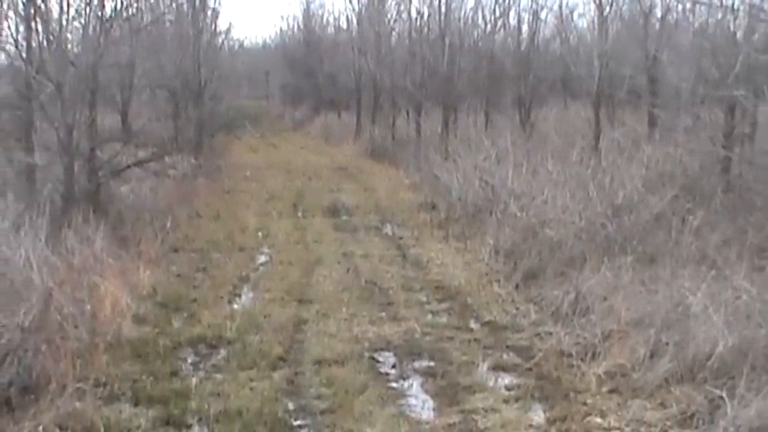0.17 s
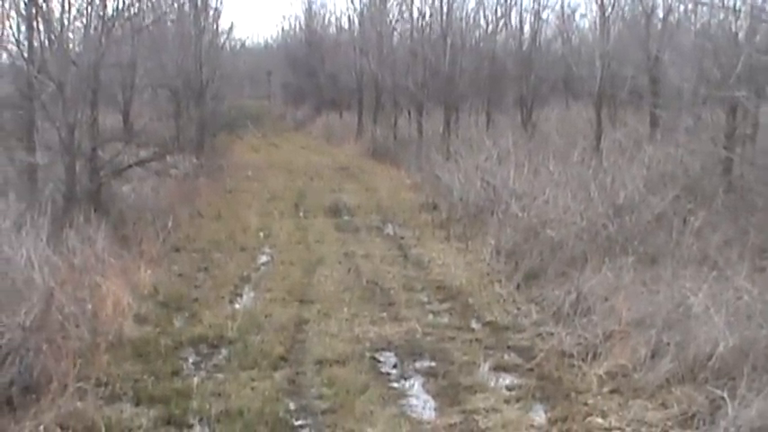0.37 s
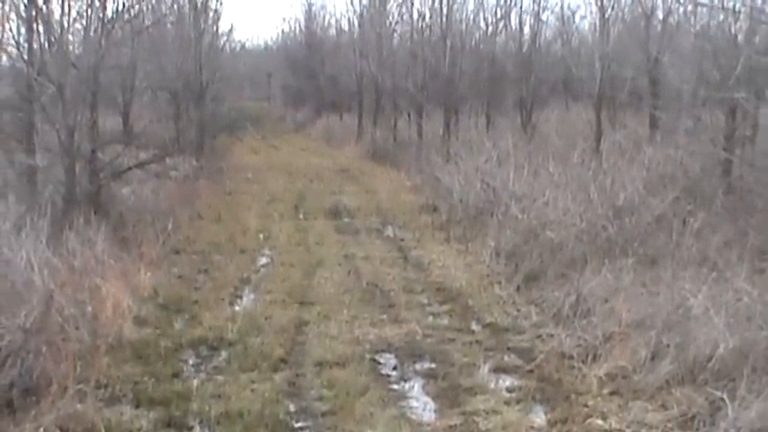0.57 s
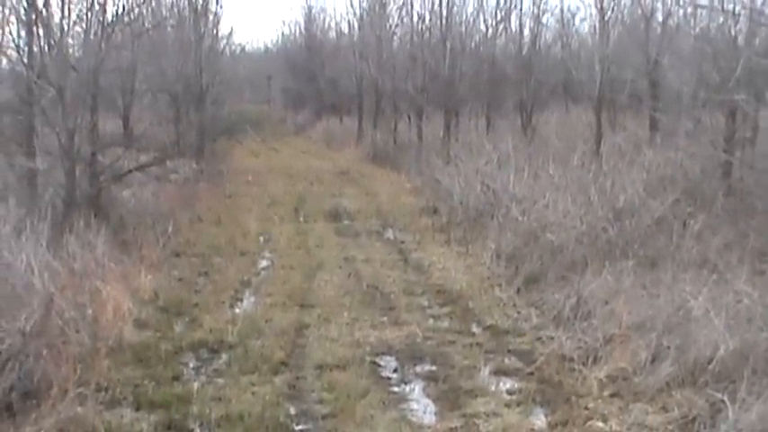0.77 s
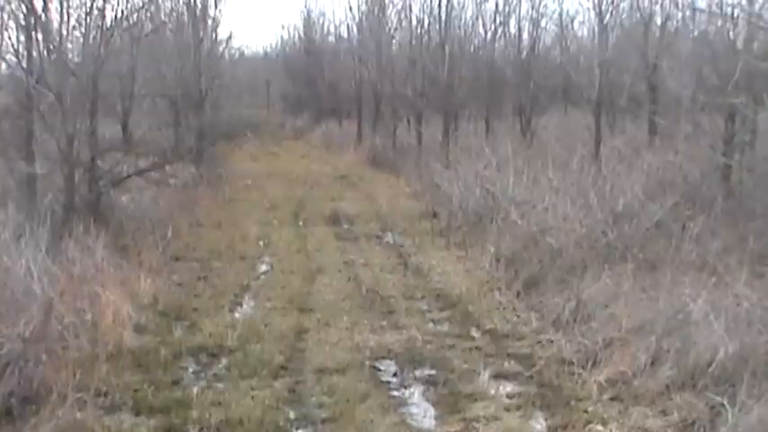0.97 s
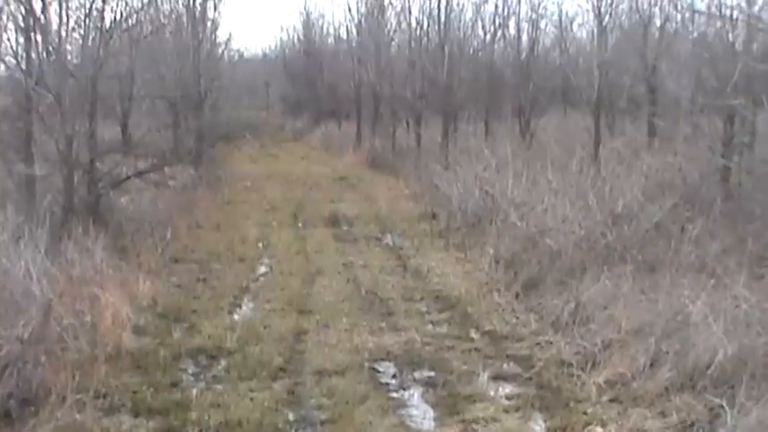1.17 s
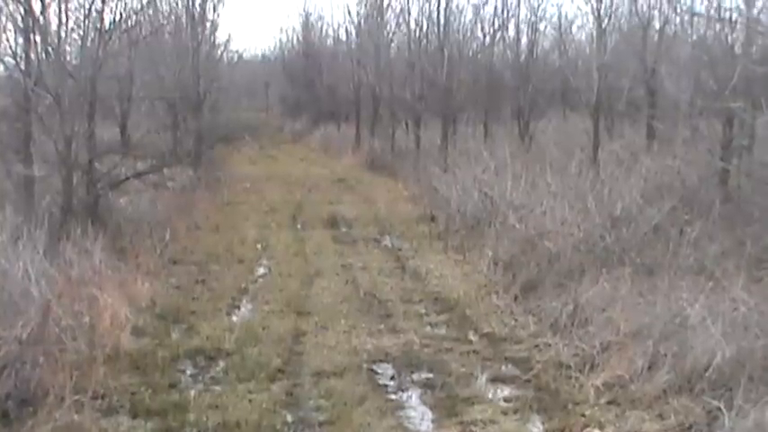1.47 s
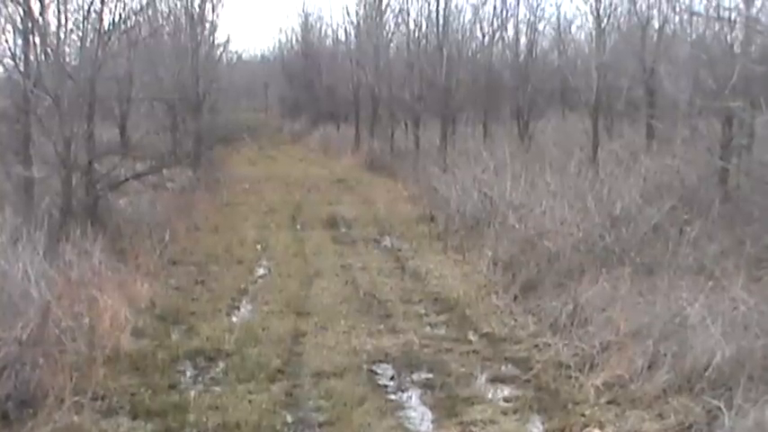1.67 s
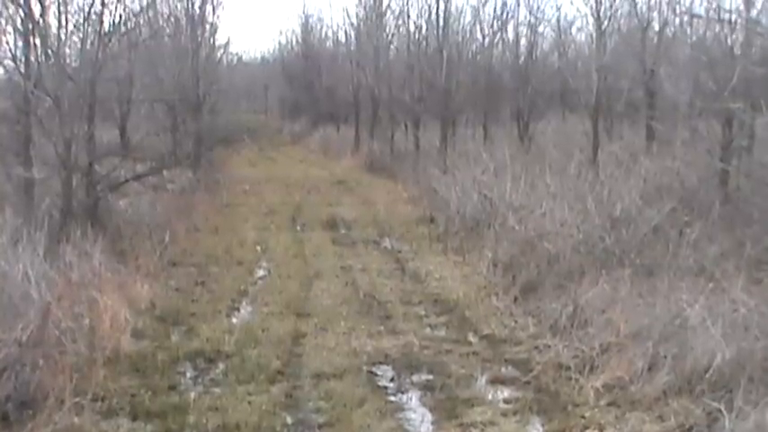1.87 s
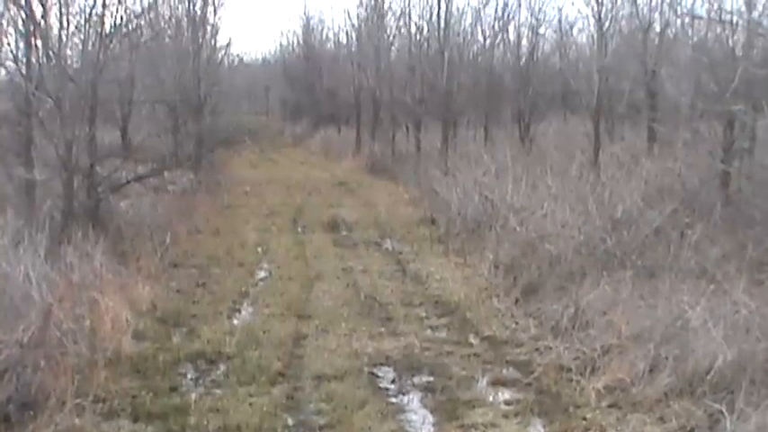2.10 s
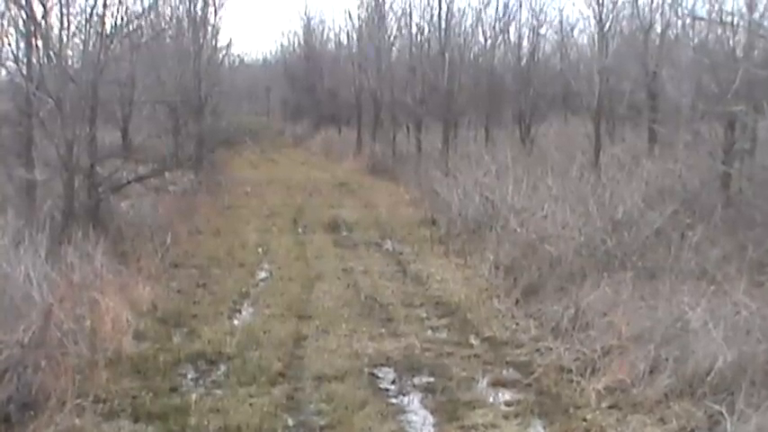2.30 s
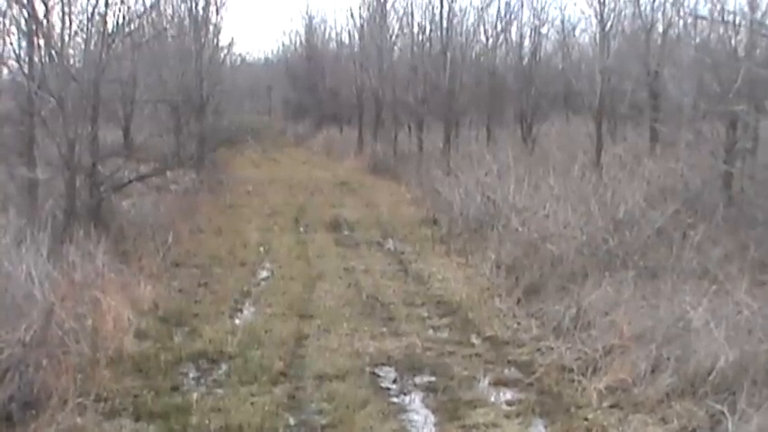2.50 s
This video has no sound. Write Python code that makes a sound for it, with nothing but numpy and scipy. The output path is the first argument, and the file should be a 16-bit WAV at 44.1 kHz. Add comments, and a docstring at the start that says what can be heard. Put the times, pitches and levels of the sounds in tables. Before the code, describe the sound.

A beagle gives five short, squeaky, hoarse yelps about half a second apart, each ending in a quick falling hoot. Trees scatter the echoes; a twig ticks early and wind rumbles on the microphone near the end.

```python
"""At first the trees still ring from an earlier bayed note, over a quiet steady hiss and a thin high whine.
A beagle then yelps five times, about half a second apart. Each yelp opens with a high squeak, breaks into
a lower rasp, settles on a clear bayed note and ends in a falling hoot; trees scatter echoes of it all.
The voice is built from overtones. A twig ticks (filtered noise that dies fast) after the first yelp;
from 1.8 s puffs of wind rumble on the microphone (low noise), and a fainter tick comes at 2.2 s."""
import sys
import numpy as np
from scipy import signal
from scipy.fft import rfft, irfft, next_fast_len
from scipy.io import wavfile
from scipy.ndimage import map_coordinates

SR = 44100
rng = np.random.default_rng(int(sys.argv[2]) if len(sys.argv) > 2 else 0)


def wrap_up_sound(samples):
    """Save the sound to the file named by the first command line argument, as 16-bit audio."""
    columns = np.atleast_2d(samples).T
    # keep every value between -1 and 1, then stretch to whole-number steps
    tamed = np.clip(columns, -1, 1)
    steps = np.round(tamed * 32767).astype(np.int16)
    wavfile.write(sys.argv[1], SR, steps)


N = 116865
LEAD_S = .3  # computed ahead of time zero, so that the earlier bayed note can leave its echo
LEAD = int(LEAD_S * SR)
T = np.arange(-LEAD, N) / SR
TOP_HZ = 15900  # nothing sounds at or above this

# Colour of the steady hiss: f/Hz, level/dB
AIR_COLOUR = [(15, -29), (25, -2), (260, -2), (537, -5.5), (1080, -10), (1710, -15.5), (15500, -24.5)]
AIR_DB = -48
# How alike left and right are in all the noises: f/Hz, likeness (1 = the same)
LIKENESS = [(60, 0.92), (250, 0.56), (4000, 0.057), (14000, 0.84)]
WHINE_HZ, WHINE_DB = 15734, -70

# How long the deep woods ring: f/Hz, time to fall 60 dB/s
WOODS_T60 = [(500, 0.7), (1100, 0.62), (3000, 0.81), (8000, 0.25)]
# Colour of all the tree echoes: f/Hz, level/dB
TREES_COLOUR = [(780, -4), (1080, 1), (1700, 1.5), (2300, 5.5), (3000, 3), (8000, 14.5)]
TRUNKS_T60_S, TREES_DELAY_S = .25, .018
TRUNKS_DB, WOODS_DB = -12, -17  # before the echo colour
TREES_SIDE_DB = -11  # left-right difference against the middle

# Gliding opening squeak, one list a yelp: t/s, pitch/Hz, level before colour/dB, roughness (0 to 1)
SQUEAK_PATHS = [
    [(.235, 705, -29.5, 0), (.247, 809, -16.5, 0.01), (.262, 808, -16, 0.31), (.272, 711, -23.5, 0.39),
     (.29, 759, -21.5, 0.3), (.303, 685, -31, 0.15)],
    [(.731, 763, -33.5, 0.14), (.746, 897, -29.5, 0.31), (.766, 1090, -26, 0.14)],
    [(1.253, 676.6, -33, 0.1), (1.272, 825.7, -12.5, 0.2), (1.284, 784, -25.5, 0.54),
     (1.304, 721.6, -19.5, 0.28), (1.328, 701.4, -16.5, 0.31), (1.36, 690, -39, 0.42)],
    [(1.773, 953.5, -30.5, 0.14), (1.792, 926, -28, 0.13), (1.799, 781, -33.5, 0.28),
     (1.818, 687, -26.5, 0)],
    [(2.239, 836.5, -22.5, 0.08), (2.258, 872, -15, 0.07), (2.268, 817, -22.5, 0.37),
     (2.29, 730, -37.5, 0.08), (2.305, 707, -26.5, 0.42), (2.332, 713, -25.5, 0.04)],
]
# Extra strength of each squeak's shrill overtones: lift/dB
SQUEAK_SHRILL_LIFTS = [3.5, 22.5, -10, 14, -0.5]
SHRILL_HZ, SHRILL_WIDTH_HZ = 2900, 650
# Colour of the high voice, for squeaks and hoots: f/Hz, level/dB
HIGH_VOICE_COLOUR = [(800, 0), (1050, -11.5), (1600, -18), (3200, -27), (5200, -55), (9000, -47.5),
                     (16000, -70)]

# Rasp where the voice breaks lower: start t/s, peak t/s, end t/s, level/dB, tilt/dB per octave,
# pitch f/Hz, open mouth resonance f/Hz
RASP_EVENTS = [(0.245, 0.282, .335, -24.5, 0, 407, 3910), (0.737, 0.761, .81, -23, -1, 360, 3850),
               (1.26, 1.322, 1.352, -26.5, -4, 356, 3590), (1.786, 1.794, 1.845, -28.5, 7, 366, 2950),
               (2.258, 2.3, 2.33, -29, -6, 522.2, 2900)]
# Colour the throat gives the rasp: f/Hz, level/dB
RASP_COLOUR = [(430, -39), (570, 4.5), (950, -5.5), (1300, 1), (2300, -5), (3100, -4), (3700, -26),
               (5200, -41), (9000, -32), (16000, -61)]
RASP_RISE_DB, RASP_FALL_DB = 4.5, 9  # how far start and end lie below the peak
RASP_ROUGH, RASP_NOISE_DB, RASP_FLUTTER_DB = .4, -10, 2.5  # breath noise is relative to the voice
CLOSING_HZ_PER_S, CLOSED_HZ = 35800, 1180  # the mouth resonance falls as the jaw closes
RASP_LIFT_DB, RASP_WIDTH_HZ = 10, 380  # strength and width of that resonance

# Clear bayed note, the first one over before time zero: t/s, pitch/Hz, level before colour/dB,
# mouth resonance f/Hz, its lift/dB, nasal ring lift/dB
BAY_PATHS = [
    [(-.22, 555.4, -19.5, 1150, 13, 9), (-.1, 526, -36.5, 1100, -2.5, 14)],
    [(.295, 567, -37, 1650, 11, 4), (.312, 561.7, -31.5, 1580, 16, -8), (.343, 540, -34.5, 1080, 5, -7),
     (.363, 546.6, -33.5, 1510, 15.5, 23), (.377, 527, -38.5, 1440, 16.5, 9)],
    [(.766, 662.4, -34.5, 1310, 12.5, 6), (.786, 619.7, -31.5, 1740, 12, 15.5),
     (.805, 604.7, -21.5, 1750, 6, 14), (.813, 579.7, -34.5, 1330, 19.5, -7),
     (.829, 579.4, -39.5, 1180, 19.5, 1), (.855, 583, -32.5, 1540, 16, -9), (.867, 566, -34, 1500, 14, 5)],
    [(1.343, 559, -32, 1690, 10.5, 5), (1.372, 562.5, -36, 1730, 11.5, -1), (1.402, 559, -34, 1650, -12, 5)],
    [(1.803, 617.6, -34.5, 1240, 1, -9), (1.833, 593.3, -33.5, 1160, 7.5, 14.5),
     (1.862, 564.3, -35, 1150, 13.5, 4.5), (1.905, 585.8, -35, 1170, 10.5, 3),
     (1.932, 567.4, -29, 1080, -15, -5)],
    [(2.311, 606, -34.5, 1210, 10.5, -4), (2.352, 588.6, -31.5, 1530, 3.5, 13),
     (2.368, 563, -34.5, 1550, 5, -2)],
]
# Colour the throat gives the bayed note: f/Hz, level/dB
THROAT_COLOUR = [(1150, -2), (1700, -4.5), (2300, -11.5), (2950, -11), (3450, -25), (4100, -20.5),
                 (5300, -35.5), (9000, -34.5), (16000, -52)]
MOUTH_WIDTH_HZ, NASAL_HZ, NASAL_WIDTH_HZ = 290, 2990, 230
BAY_ROUGH, BAY_ROUGH_START, SETTLE_S = .03, .14, .012  # steady part, extra at onset, time to settle
BAY_SWELL_S = 0.0037

# Closing hoot: start t/s, end t/s, first pitch f/Hz, last pitch f/Hz, level before colour/dB
HOOT_EVENTS = [(.369, 0.395, 1052, 612, -29), (.862, 0.893, 966, 640, -27), (1.394, 1.411, 1130, 750, -26),
               (1.409, 1.42, 760, 678, -20), (1.91, 1.947, 1117, 554, -40), (2.37, 2.387, 927, 690, -29)]
HOOT_ROUGH, HOOT_BEND = 0.2, 0.716  # a bend below 1 makes the slide fastest at first
HOOT_EDGE_DB = 6  # both ends lie this far below the middle

# Twig ticks: t/s, level at onset/dB
TICK_EVENTS = [(0.4562, -25), (2.218, -42)]
# Colour of a tick: f/Hz, level/dB
TICK_COLOUR = [(1500, -25), (3500, 12), (5500, -7), (7500, -1), (12500, 3), (15000, -24)]
TICK_T60_S = .009

# Strength of the wind on the microphone: t/s, level/dB
WIND_LEVELS = [(1.77, -83), (1.818, -32.5), (1.85, -31.5), (1.88, -56), (1.908, -39.5), (1.965, -60),
               (2.015, -37.5), (2.064, -25), (2.105, -66), (2.17, -43.5), (2.286, -54.5), (2.65, -66)]
# Colour of the wind rumble: f/Hz, level/dB
WIND_COLOUR = [(20, -26), (60, -2), (100, 0), (170, -11), (300, -21), (1500, -62)]

# Voice: pitch scatter and size scatter at full roughness, and how often they change per second
JITTER, SHIMMER, ROUGH_RATE = .13, .6, 520
WAVER_DB, WAVER_RATE = 0.5, 39  # each overtone wavers on its own; the dB grow with its number
ATTACK_S, RELEASE_S = 0.0047, .008
PAN_DB = 1.8  # how much louder the dog is on the left than on the right


def amp(db):
    """Turn decibels into gain."""
    return 10 ** (np.asarray(db) / 20)


def unit(x):
    """Scale to an rms of 1."""
    return x / np.sqrt(np.mean(x ** 2) + 1e-20)


def along(points, hz):
    """Read a value between (frequency, value) points, on a log frequency axis."""
    f, values = np.transpose(points)
    return np.interp(np.log(hz + 1), np.log(f + 1), values)


def bell(hz, centre, width):
    """The shape of a resonance, 1 at its centre."""
    return np.exp(-.5 * ((hz - centre) / width) ** 2)


def wobble(t, rate):
    """A smooth random curve through `rate` random points a second."""
    position = (t - t[0]) * rate
    return map_coordinates(rng.standard_normal(2048), [position], mode="wrap")


def filtered(x, response):
    """Multiply the spectrum of x by a response that depends on frequency."""
    n = x.shape[-1]
    padded = next_fast_len(n + 8192)
    spectrum = rfft(x, padded) * response(np.fft.rfftfreq(padded, 1 / SR))
    return irfft(spectrum, padded)[..., :n]


def span(start, end):
    """The samples of one sound, their times and a gate with soft edges."""
    at = (T >= start) & (T < end + RELEASE_S / 2)
    t = T[at]
    fade_in = np.clip((t - start) / ATTACK_S, 0, 1)
    fade_out = np.clip((end - t) / RELEASE_S + .5, 0, 1)
    return at, t, fade_in * fade_out


def rush(colour):
    """Stereo noise of rms 1: a shared middle plus a left-right difference set by LIKENESS."""
    def middle_and_side(hz):
        angle = np.arccos(np.clip(along(LIKENESS, hz), -1, 1)) / 2
        return amp(along(colour, hz)) * [np.cos(angle), np.sin(angle)]

    mid, side = filtered(rng.standard_normal((2, len(T))), middle_and_side)
    return unit(np.array([mid + side, mid - side]))


def air():
    """Still air as a steady coloured hiss."""
    return amp(AIR_DB) * rush(AIR_COLOUR)


def whine():
    """A thin steady whine: one pure high tone."""
    return amp(WHINE_DB) * np.sqrt(2) * np.sin(2 * np.pi * WHINE_HZ * T)


def echo(x, t60):
    """Scatter from the trees: a delayed noise tail in which each frequency dies at its own speed."""
    hz, t, grid = signal.stft(rng.standard_normal((2, SR)), SR, nperseg=256)
    decay = amp(-60 * t / t60(hz)[:, None])
    tail = signal.istft(grid * decay, SR, nperseg=256)[1]
    tail = np.pad(tail, ((0, 0), (int(TREES_DELAY_S * SR), 0)))
    tail = tail / np.linalg.norm(tail[0])
    wet = signal.fftconvolve(x[None], tail, axes=1)[:, :len(x)]
    mid, side = filtered(wet, lambda f: amp(along(TREES_COLOUR, f)))
    side = amp(TREES_SIDE_DB) * side
    return np.array([mid + side, mid - side])


def trees(dog):
    """Near trunks ring with one decay for all frequencies; deep woods with one for each."""
    trunks = amp(TRUNKS_DB) * echo(dog, lambda hz: np.full(len(hz), TRUNKS_T60_S))
    woods = amp(WOODS_DB) * echo(dog, lambda hz: along(WOODS_T60, hz))
    return trunks + woods


def folds(t, pitch, rough, colour_db, count=36):
    """Vocal folds as a stack of overtones; roughness scatters their pitch and size."""
    rough_pitch = pitch * (1 + JITTER * rough * wobble(t, ROUGH_RATE))
    phase = 2 * np.pi * np.cumsum(rough_pitch) / SR
    k = np.arange(1, count + 1)[:, None]  # overtone numbers, 1 is the pitch itself
    waver = WAVER_DB * np.log10(k) * np.array([wobble(t, WAVER_RATE) for _ in k])
    size = amp(colour_db(k * pitch) + waver) * (k * pitch < TOP_HZ)
    partials = size * np.sin(k * phase + rng.uniform(0, 2 * np.pi, k.shape))
    return np.sqrt(2) * partials.sum(0) * (1 + SHIMMER * rough * wobble(t, ROUGH_RATE))


def squeaks():
    """A gliding high tone, with its own shrillness each time and roughness as the voice breaks."""
    out = np.zeros(len(T))
    for rows, shrill_db in zip(SQUEAK_PATHS, SQUEAK_SHRILL_LIFTS):
        times, *columns = np.transpose(rows)
        at, t, gate = span(times[0], times[-1])
        pitch, db, rough = [np.interp(t, times, c) for c in columns]

        def colour(hz):
            return along(HIGH_VOICE_COLOUR, hz) + shrill_db * bell(hz, SHRILL_HZ, SHRILL_WIDTH_HZ)

        out[at] += gate * amp(db) * folds(t, pitch, rough, colour)
    return out


def closing_mouth(x, open_hz):
    """A mouth resonance that sweeps down from open_hz as the jaw closes."""
    hz, t, grid = signal.stft(x, SR, nperseg=256)
    mouth = np.maximum(open_hz - CLOSING_HZ_PER_S * t, CLOSED_HZ)
    lift = amp(RASP_LIFT_DB * bell(hz[:, None], mouth, RASP_WIDTH_HZ))
    return signal.istft(grid * lift, SR, nperseg=256)[1][:len(x)]


def rasps():
    """Rough flapping of the folds and a little breath noise, through throat and closing mouth."""
    out = np.zeros(len(T))
    for start, peak, end, db, tilt_db, pitch, open_hz in RASP_EVENTS:
        at, t, gate = span(start, end)
        flaps = unit(folds(t, pitch, RASP_ROUGH, np.zeros_like))
        breath = amp(RASP_NOISE_DB) * rng.standard_normal(len(T))[at]
        flutter = amp(RASP_FLUTTER_DB * wobble(t, ROUGH_RATE / 2))

        def throat(hz):
            octaves = np.log2(np.clip(hz, 500, 3500))  # the tilt acts between these frequencies
            return amp(along(RASP_COLOUR, hz) + tilt_db * octaves)

        voice = closing_mouth(filtered((flaps + breath) * flutter, throat), open_hz)
        drop_db = np.interp(t, [start, peak, end], [RASP_RISE_DB, 0, RASP_FALL_DB])
        out[at] += gate * unit(voice) * amp(db - drop_db)
    return out


def bays():
    """The clear note, shaped by a moving mouth resonance and a nasal ring at a fixed pitch."""
    out = np.zeros(len(T))
    for rows in BAY_PATHS:
        times, *columns = np.transpose(rows)
        at, t, gate = span(times[0], times[-1])
        pitch, db, mouth, lift, ring = [np.interp(t, times, c) for c in columns]
        age = t - times[0]
        rough = BAY_ROUGH + BAY_ROUGH_START * np.exp(-age / SETTLE_S)
        swell = np.clip(age / BAY_SWELL_S, 0, 1)

        def colour(hz):
            mouth_db = lift * bell(hz, mouth, MOUTH_WIDTH_HZ)
            nasal_db = ring * bell(hz, NASAL_HZ, NASAL_WIDTH_HZ)
            return along(THROAT_COLOUR, hz) + mouth_db + nasal_db

        out[at] += gate * swell * amp(db) * folds(t, pitch, rough, colour)
    return out


def hoots():
    """The voice flips back to its high register and slides down."""
    out = np.zeros(len(T))
    for start, end, first_hz, last_hz, db in HOOT_EVENTS:
        at, t, gate = span(start, end)
        progress = np.clip((t - start) / (end - start), 0, 1)
        pitch = first_hz + (last_hz - first_hz) * progress ** HOOT_BEND
        arch_db = db - HOOT_EDGE_DB * (2 * progress - 1) ** 2
        voice = folds(t, pitch, HOOT_ROUGH, lambda hz: along(HIGH_VOICE_COLOUR, hz))
        out[at] += gate * amp(arch_db) * voice
    return out


def ticks():
    """Small dry twig snaps: noise that starts at once and dies in milliseconds."""
    level = np.zeros(len(T))
    for start, db in TICK_EVENTS:
        level += (T >= start) * amp(db - 60 * np.abs(T - start) / TICK_T60_S)
    return level * rush(TICK_COLOUR)


def wind():
    """Puffs of wind on the microphone: low rumbling noise that swells and fades."""
    return amp(np.interp(T, *np.transpose(WIND_LEVELS))) * rush(WIND_COLOUR)


def scene():
    """The dog and its tree echoes a little to the left, with hiss, whine, ticks and wind."""
    dog = squeaks() + rasps() + bays() + hoots()
    pan = amp([[PAN_DB / 2], [-PAN_DB / 2]])
    near = air() + whine() + ticks() + wind()
    return ((dog + trees(dog)) * pan + near)[:, LEAD:]


def record(dry):
    """Remove everything at or above the top frequency."""
    return filtered(dry, lambda hz: hz < TOP_HZ)


dry = scene()
out = record(dry)
wrap_up_sound(out)
```